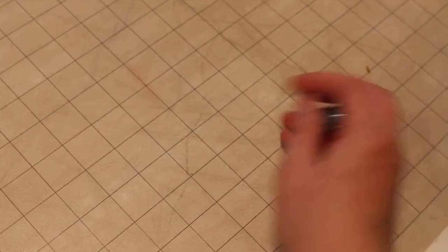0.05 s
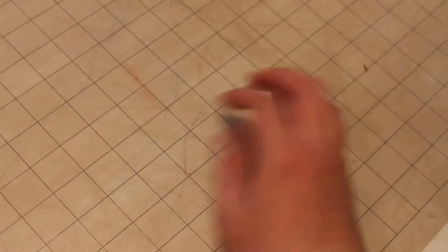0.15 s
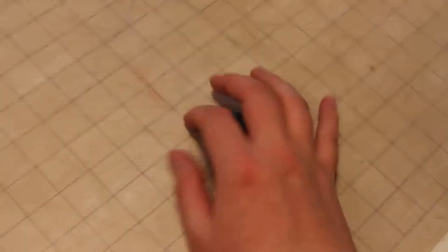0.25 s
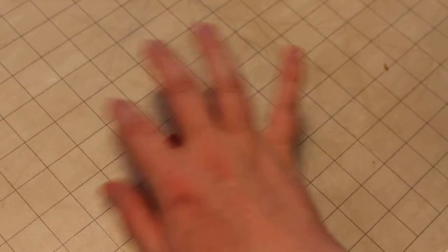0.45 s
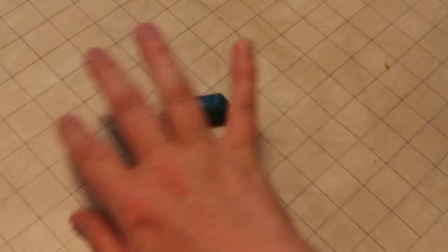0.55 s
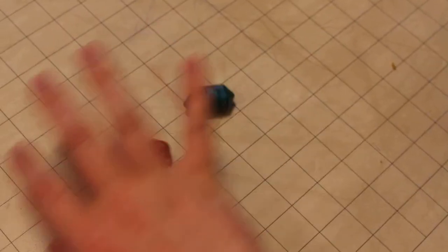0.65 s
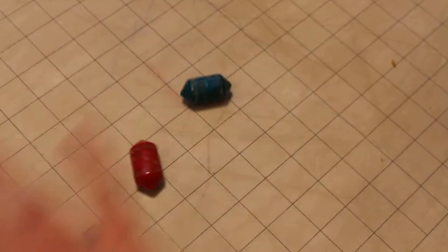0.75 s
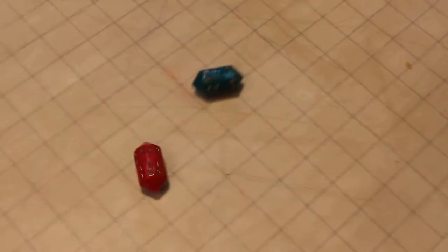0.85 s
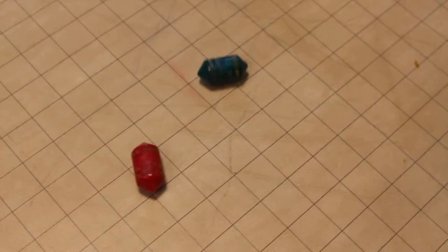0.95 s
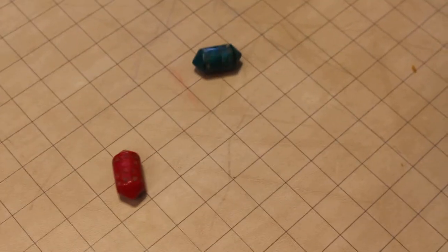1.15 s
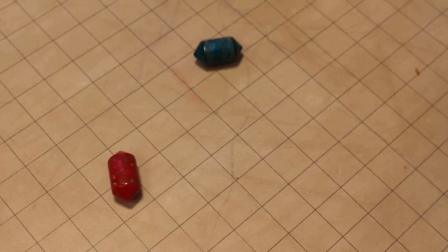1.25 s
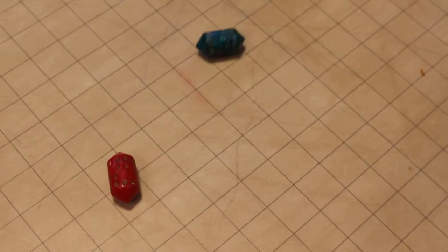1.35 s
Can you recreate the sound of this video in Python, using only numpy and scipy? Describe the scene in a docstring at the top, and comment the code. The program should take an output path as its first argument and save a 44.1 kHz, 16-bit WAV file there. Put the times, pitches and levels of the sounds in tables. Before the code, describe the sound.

Two dice clatter onto a mat-covered table, close by in a small room. After a faint hand rustle at the start, they land at about 0.2 seconds in a rapid cluster of hard clacks and lighter taps, weakening and stopping by 0.5 seconds with a short room echo. A barely audible rustle follows near 0.7 seconds, and a low room hum continues throughout.

```python
"""A quick run of hard clacks in a small, live room: two barrel dice drop on a mat-covered table
and tumble to rest, pattering over their edges between the clacks. Each contact is a short pulse,
followed by echoes off nearby surfaces, a few ringing tones and the room's tail.
A low room hum lies under it all, and the hand rustles faintly before and after the throw."""
import sys
import numpy as np
from scipy import signal
from scipy.fft import rfft, irfft
from scipy.io import wavfile

SR = 44100
rng = np.random.default_rng(int(sys.argv[2]) if len(sys.argv) > 2 else 0)


def store_pcm(level_fs):
    """Save levels as 16-bit WAV."""
    pcm = np.round(np.clip(level_fs, -1, 1) * 32767).astype(np.int16)
    wavfile.write(sys.argv[1], SR, np.atleast_2d(pcm).T)


N = 61739

# The bed of hum and hiss. Each row: frequency in Hz, noise density in dB.
HUM_COLOUR = [(25, -24), (65, -5), (98, -12), (130, 1.5), (190, -5), (280, -2), (400, 0.5), (540, -11.5),
              (1000, -12), (2000, -20), (4200, -24), (9000, -32.5), (15500, -41)]
# How centred the bed sits. Each row: frequency in Hz, left-right likeness (1 is mono, 0 is wide).
HUM_STEREO_LIKENESS = [(60, 0.83), (350, 0.93), (1000, 0.58), (2500, 0), (8000, 0)]
# Steady tones in the hum. Each row: pitch in Hz, level in dB.
HUM_DRONES = [(138, -58), (345, -57.5)]
# The moving hand. Each row: peak time in seconds, half-length in seconds, level in dB, centre in Hz.
HAND_RUSTLES = [(0.005, 0.055, -56.5, 3600), (0.69, 0.046, -68, 9100)]
# Length of the room's tail. Each row: frequency in Hz, seconds to fall by 60 dB.
ROOM_DECAY = [(150, 0.36), (900, 0.31), (2000, 0.3), (5500, 0.26), (12000, 0.21)]
# Tone of the tail. Each row: frequency in Hz, level in dB.
TAIL_COLOUR = [(120, -17), (400, -2.5), (1000, 1), (2200, -1), (4500, 2), (10000, -3)]
# How centred the tail sits. Each row: frequency in Hz, left-right likeness.
TAIL_LIKENESS = [(200, 1), (1000, 0.79), (2000, 0.47), (4000, 0.37), (9000, 0.97)]
# Tones that ring on in table and room. Each row: pitch in Hz, relative level in dB.
RINGING_MODES = [(130, -12), (291, -10), (511, -8), (720, -8), (987, 1), (1055, 2.5), (1220, -4),
                 (1265, -.5), (1442, -2), (1522, -2), (1905, -5), (1963, -5), (2234, -2), (2273, 1),
                 (2870, -3), (3032, -1)]
# Basic tone of a die's contact. Each row: frequency in Hz, level in dB.
CONTACT_COLOUR = [(70, -45), (130, -17), (300, -4.5), (480, -9), (630, -10), (830, -9), (1020, -3),
                  (1160, -4.5), (1450, -1), (2400, -0.5), (3700, -5.5), (5000, -3.5), (6600, -14),
                  (16000, -35)]
# Light touches of the tumbling edges. Each row: start in seconds, level in dB, tick boost in dB.
EDGE_TOUCHES = [(0.268, -13.5, 14), (0.296, -10, 4), (0.318, -18.5, 14), (0.353, -11, 8),
                (0.372, -19.5, 19), (0.385, -22, 21), (0.397, -10, 9.5), (0.4461, -13.5, 8)]
# The main hits. Each row: start in seconds, level in dB, brightness cutoff in Hz, resonance in Hz,
# its boost in dB, direct sound in dB, knock boost in dB, tick boost in dB, first echo in dB,
# second echo's delay in seconds, second echo in dB.
DICE_CLACKS = [(0.2181, -.5, 2400, 1670, 1, 0, 2.5, -11, -6.5, 0.00196, -1),
               (0.2421, -2.5, 3780, 2520, 3, 0, -3, 3, -2.5, 0.0021, -0.5),
               (0.2541, -4, 3760, 1510, -3.5, 1, -15.5, -2.5, -3, 0.0038, 1.5),
               (0.3045, -1.5, 4240, 4630, 2, -2, -1, -1, 0, 0.0026, -2),
               (0.3267, -9, 3540, 2030, 9.5, -7, 3, 12, -7.5, 0.002052, -2.5),
               (0.3764, -5, 3630, 2130, 1.5, -4, 1.5, 6.5, -5, 0.002093, 0),
               (0.4228, -13.5, 2900, 2280, 4, -1, 7, 9, -3.5, 0.00212, -2.5),
               (0.4384, -6, 2940, 2170, 2.5, -8, 4, 3, 0, 0.00211, 0),
               (0.4797, -14, 3900, 1070, 7.5, -7, 3, -6, -2, 0.00216, -0.5)]

HUM_DB, HUM_PAN_DB = -45, 0.3
ROOM_DB, ROOM_ONSET_S, ROOM_PAN_DB = -2, 0.0076, 1
MODES_DB, MODE_SPREAD_DB = -48, 1.5
SCATTER_DB, SCATTER_T60_S, SCATTER_LIKENESS = -8, .022, .5
FIRST_ECHO_S, ECHO_PAN_DB = 0.001248, 2
THIRD_ECHO_S, THIRD_ECHO_DB = 0.0040, -7
PULSE_DB, RING_Q, KNOCK_HZ, KNOCK_DB = 19.5, 7, 475, 5
TICK_DB, TICK_LOW_HZ, TICK_TOP_HZ, TICK_T60_S = -18.5, 6800, 10200, 0.0046
CEILING, CUTOFF_HZ = .9, 16000


def from_db(db):
    """Decibels to gain."""
    return 10 ** (np.asarray(db) / 20)


def at_hz(points, hz):
    """Read a table on a log-frequency axis."""
    frequencies, values = np.transpose(points)
    return np.interp(np.log(np.maximum(hz, 1)), np.log(frequencies), values)


def pan(db):
    """Stereo gains, with the left louder by db."""
    return from_db(np.array([[db], [-db]]) / 2)


def cut(x, hz, kind, order):
    """Butterworth low- or high-pass."""
    return signal.sosfilt(signal.butter(order, hz, kind, fs=SR, output="sos"), x)


def add(out, x, start_s):
    """Mix x into out from start_s on."""
    start = int(round(start_s * SR))
    length = min(x.shape[-1], out.shape[-1] - start)
    out[..., start:start + length] += x[..., :length]


def unit_energy(stereo):
    """Scale to an average energy of one per channel."""
    return stereo / np.sqrt(np.sum(stereo ** 2) / 2)


def noise_spectrum(colour, likeness, size):
    """Spectrum of stereo noise, its width set by the blend of mid and side."""
    hz = np.fft.rfftfreq(size, 1 / SR)
    mid, side = np.exp(2j * np.pi * rng.random((2, len(hz))))
    alike = at_hz(likeness, hz)
    stereo = np.sqrt(1 + alike) * mid + np.sqrt(1 - alike) * side * [[1], [-1]]
    return from_db(at_hz(colour, hz)) * np.sqrt(size / 2) * stereo


def room_hum():
    """Steady low hum with two faint tones and a little hiss."""
    t = np.arange(N) / SR
    noise = irfft(noise_spectrum(HUM_COLOUR, HUM_STEREO_LIKENESS, size=2 * N))[:, :N]
    tones = sum(from_db(db) * np.sqrt(2) * np.sin(2 * np.pi * (hz * t + rng.random()))
                for hz, db in HUM_DRONES)
    return pan(HUM_PAN_DB) * (from_db(HUM_DB) * noise / noise.std() + tones)


def hand():
    """Faint swells of hiss as the hand swings out and draws back."""
    out, t = np.zeros((2, N)), np.arange(N) / SR
    for peak_s, half_s, db, hz in HAND_RUSTLES:
        hiss = cut(rng.standard_normal((2, N)), hz, "high", order=4)
        hiss = cut(hiss, hz, "low", order=4)
        swell = np.exp(-((t - peak_s) / half_s) ** 2)
        out += from_db(db) * swell * hiss / hiss.std()
    return out


def room_tail():
    """Diffuse reverb, the highs dying first; different for every spot on the table."""
    size = 32768
    t, hz = np.arange(size) / SR, np.fft.rfftfreq(size, 1 / SR)
    spectrum = noise_spectrum(TAIL_COLOUR, TAIL_LIKENESS, size)
    centres, decays_s = np.transpose(ROOM_DECAY)
    tail = np.zeros((2, size))
    for t60, weights in zip(decays_s, np.eye(len(centres))):
        band = at_hz(list(zip(centres, weights)), hz)   # crossfades into its neighbours
        tail += irfft(spectrum * band) * from_db(-60 * t / t60)
    fade_in = 1 - np.exp(-(t / ROOM_ONSET_S) ** 2)
    return from_db(ROOM_DB) * pan(ROOM_PAN_DB) * unit_energy(tail * fade_in)


def ringing():
    """Tones of table and room, each struck with a strength of its own and dying with the tail."""
    t = np.arange(SR // 2) / SR
    tones = np.zeros(len(t))
    for hz, db in RINGING_MODES:
        struck_db = db + MODE_SPREAD_DB * rng.standard_normal()
        envelope = from_db(struck_db - 60 * t / at_hz(ROOM_DECAY, hz))
        tones += envelope * np.sin(2 * np.pi * hz * t)
    return from_db(MODES_DB) * tones


def near_field(direct_db, first_db, second_s, second_db):
    """Direct sound, three echoes off nearby surfaces and a brief scatter from the tabletop."""
    t = np.arange(SR // 20) / SR
    white = irfft(noise_spectrum([(1, 0)], [(1, SCATTER_LIKENESS)], size=4096))[:, :len(t)]
    envelope = np.minimum(t / FIRST_ECHO_S, 1) * from_db(-60 * t / SCATTER_T60_S)
    out = from_db(SCATTER_DB) * unit_energy(white * envelope)
    out[:, 0] += from_db(direct_db)
    add(out, from_db(first_db) * pan(ECHO_PAN_DB), FIRST_ECHO_S)
    add(out, from_db(second_db) * pan(ECHO_PAN_DB), second_s)
    add(out, from_db([THIRD_ECHO_DB]), THIRD_ECHO_S)
    return out


def in_room(hit, early):
    """Carry a dry hit to the listener: early sound, ringing tones and the room's tail."""
    response = room_tail()
    add(response, early, 0)
    add(response, ringing(), 0)
    return signal.fftconvolve(response, hit, axes=1)


def tight_pulse(colour, size):
    """The snappiest pulse with this colour: minimum phase, its energy packed at the start."""
    gains = from_db(at_hz(colour, np.fft.rfftfreq(size, 1 / SR)))
    cepstrum = irfft(np.log(gains))
    cepstrum[1:size // 2] *= 2
    cepstrum[size // 2 + 1:] = 0
    return irfft(np.exp(rfft(cepstrum)))


def contact(bright_hz, ring_hz, ring_db, knock_db, tick_db):
    """A dry hit, duller for a soft landing: one resonance, a low knock and the hard edge's gritty tick."""
    pulse = cut(tight_pulse(CONTACT_COLOUR, size=2048), bright_hz, "low", order=4)
    resonance = signal.lfilter(*signal.iirpeak(ring_hz, RING_Q, fs=SR), pulse)
    pulse += (from_db(ring_db) - 1) * resonance
    knock = cut(pulse, KNOCK_HZ, "low", order=1)
    pulse += (from_db(KNOCK_DB + knock_db) - 1) * knock
    t = np.arange(len(pulse)) / SR
    grit = rng.standard_normal((2, len(t))) * from_db(-60 * t / TICK_T60_S)
    tick = cut(unit_energy(grit), TICK_LOW_HZ, "high", order=2)
    tick = cut(tick, TICK_TOP_HZ, "low", order=4)
    return from_db(PULSE_DB) * pulse + from_db(TICK_DB + tick_db) * tick


def dice():
    """The dice clack down on the table and patter over their edges in between."""
    out = np.zeros((2, N))
    for start_s, db, bright_hz, ring_hz, ring_db, direct_db, knock_db, tick_db, *echoes in DICE_CLACKS:
        clack = contact(bright_hz, ring_hz, ring_db, knock_db, tick_db)
        early = near_field(direct_db, *echoes)
        add(out, from_db(db) * in_room(clack, early), start_s)
    for start_s, db, tick_db in EDGE_TOUCHES:
        touch = contact(bright_hz=3430, ring_hz=1335, ring_db=7.5, knock_db=-1, tick_db=tick_db)
        early = near_field(direct_db=-3, first_db=-6, second_s=.0022, second_db=-5)
        add(out, from_db(db) * in_room(touch, early), start_s)
    return out


def scene():
    """The throw up front, over the room's hum and the hand's rustle."""
    return dice() + room_hum() + hand()


def record(dry):
    """Clip any peak above the ceiling, then cut the very top steeply."""
    low_pass = signal.ellip(12, .1, 90, CUTOFF_HZ, fs=SR, output="sos")
    return signal.sosfilt(low_pass, np.clip(dry, -CEILING, CEILING))


dry = scene()
out = record(dry)
store_pcm(out)
```